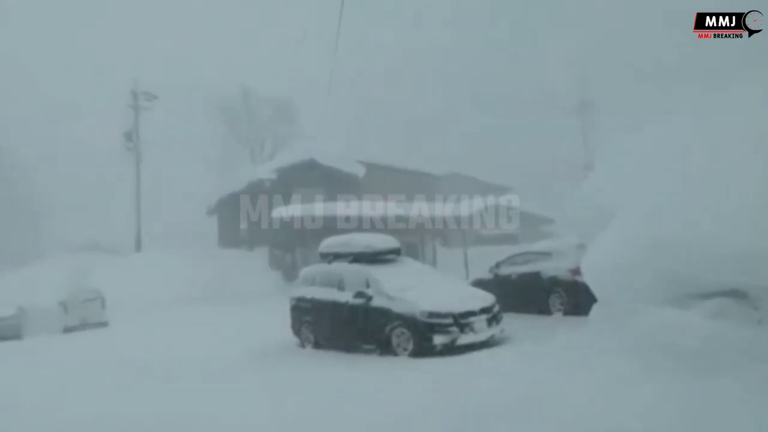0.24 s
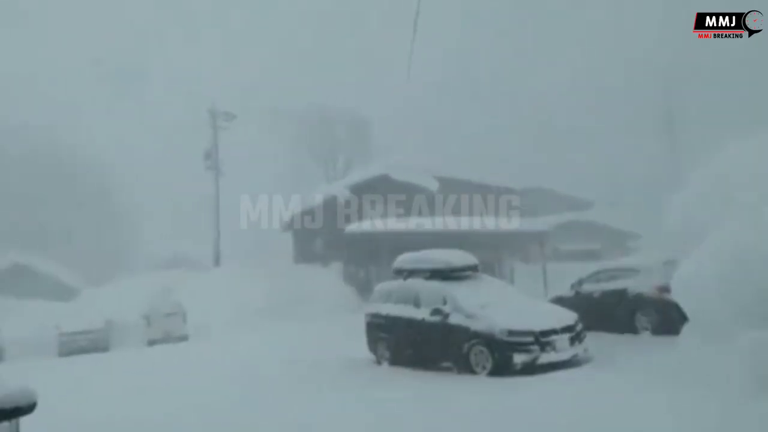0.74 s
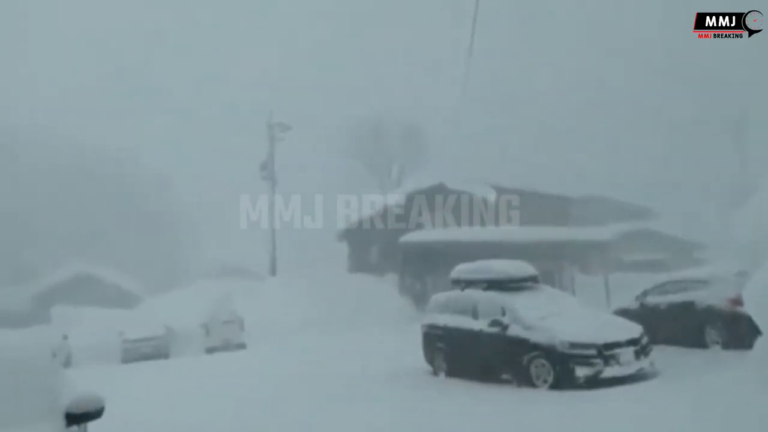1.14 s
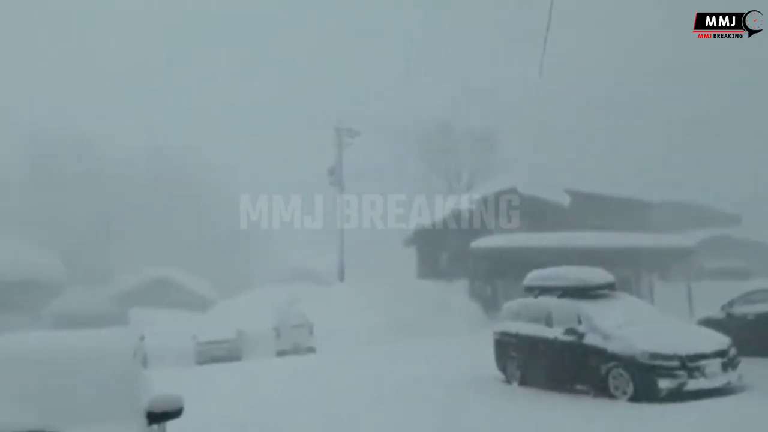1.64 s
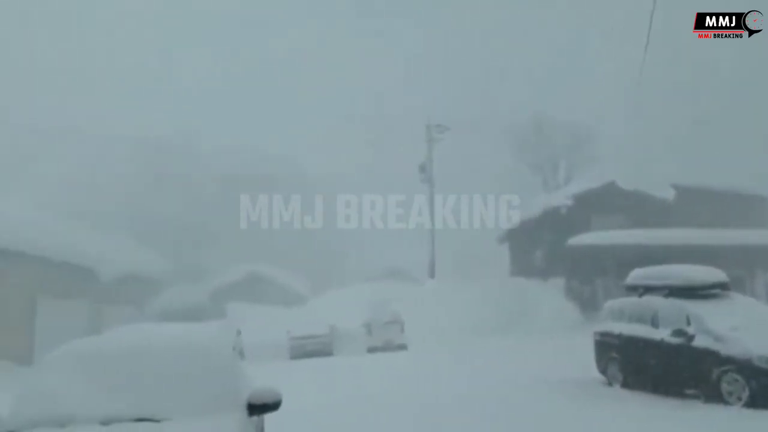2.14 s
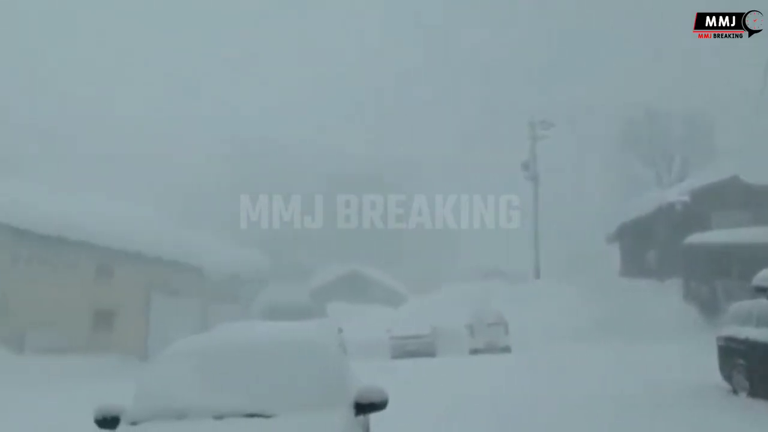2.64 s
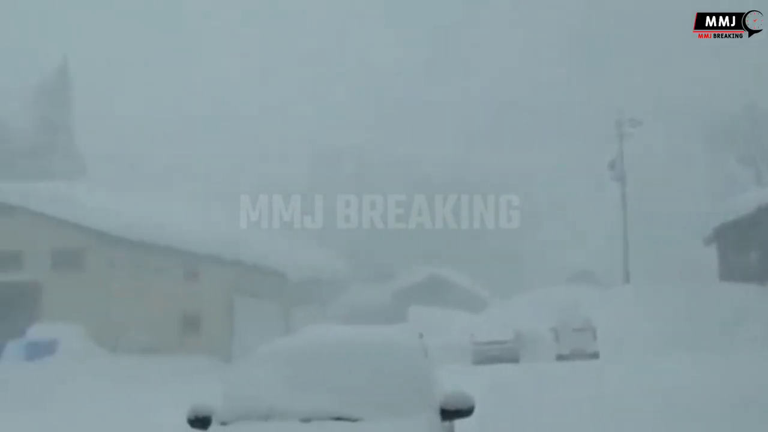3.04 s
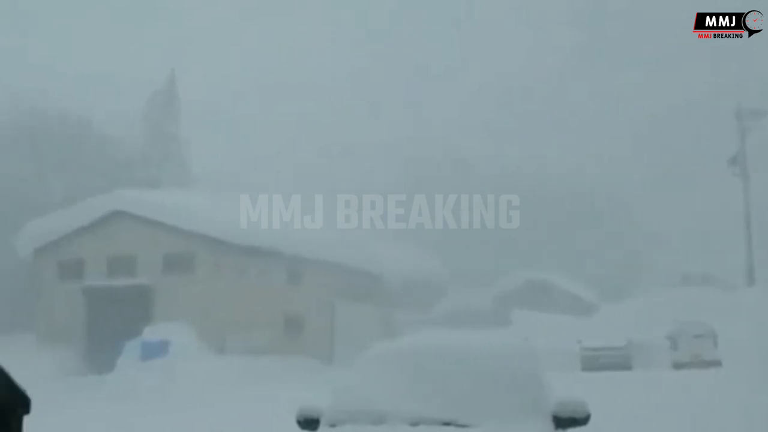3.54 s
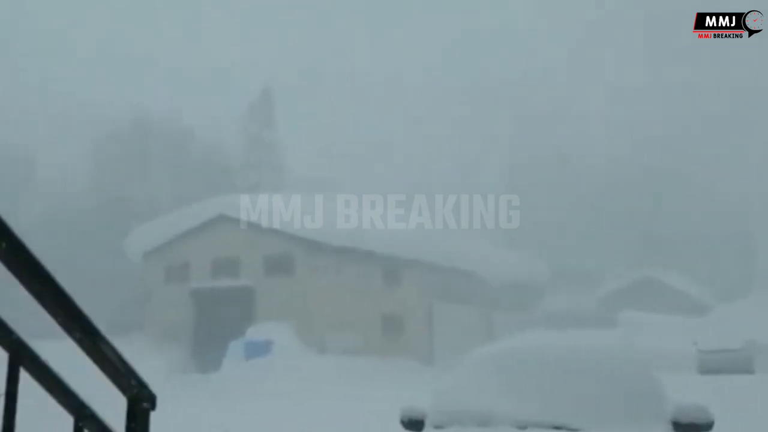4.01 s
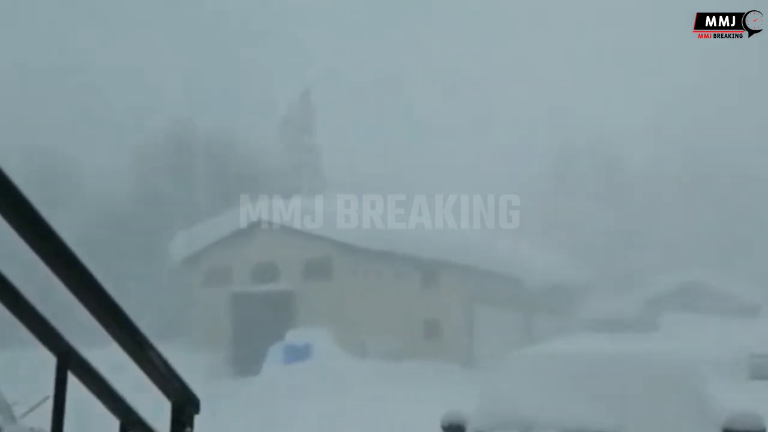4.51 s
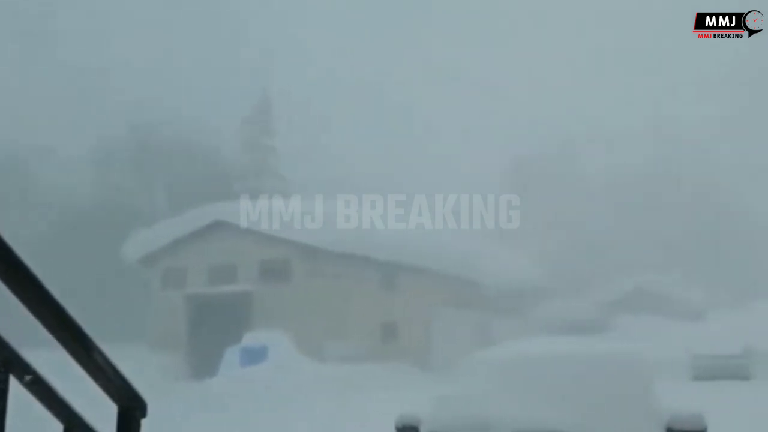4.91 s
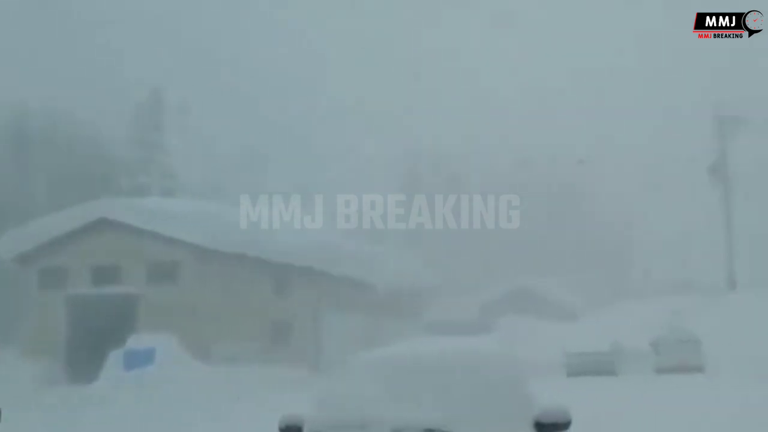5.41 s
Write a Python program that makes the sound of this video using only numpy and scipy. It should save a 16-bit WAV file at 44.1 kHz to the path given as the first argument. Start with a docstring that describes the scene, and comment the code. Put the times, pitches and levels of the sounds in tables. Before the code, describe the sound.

A blizzard blows across an open, snow-buried yard into a hand-held microphone. The sound starts faint and swells within 0.2 seconds into deep, rough, lumpy rumble, with quick buffets around 0.5 seconds and a strong surge near 1. Gusts keep striking irregularly, with heavy thumps near 1.8, 2.2 and 2.5 seconds. Beneath them a hollow low drone catches and moans, clearest near 0.5, 1.1, 1.8 and 3.8, while a fainter breathy howl slides above it, fullest around 2.1. Air rushes round walls and vehicles. Fine snow hisses in ragged, sandy bands, puffing up near 1.7, 2.5 and 4.3. Wind surges at 3.2, drops briefly at 3.4, returns by 3.6, eases around 4.7 to 5.0 and surges again near 5.4. A few tiny ice ticks are almost buried. The storm is still blowing when it cuts off at about 5.7 seconds.

```python
"""Blizzard wind blows across a snowed-in yard and onto a hand-held microphone.
Gusts buffet the port with a rough rumble of coloured noise, evened out and then swelled by the wind.
A hollow resonance drones, moans and howls as slow noise carried on moving pitches; air rushes round the houses.
Driven snow hisses in shifting bands with a sandy grain, and now and then an ice grain ticks on the case.
The microphone's faint self-noise lies beneath."""
import sys
import numpy as np
from scipy import signal
from scipy.fft import rfft, irfft, next_fast_len
from scipy.io import wavfile
from scipy.ndimage import uniform_filter1d

SR = 44100
rng = np.random.default_rng(int(sys.argv[2]) if len(sys.argv) > 2 else 0)


def inscribe(sig):
    """Save sig as 16-bit PCM at rate SR to the path in sys.argv[1].

    A 1-D sig is mono; a 2-D sig holds one channel per row.
    Samples are clipped to [-1, 1] before scaling.
    """
    pcm = np.round(np.clip(np.atleast_2d(sig).T, -1, 1) * 32767)
    wavfile.write(sys.argv[1], SR, pcm.astype(np.int16))


N = 249606  # samples

# Strength of the wind, before each layer's own share of it.
# Each row: time in seconds, dB over usual at the microphone, dB over usual across the yard.
WIND = [(0.0, -20.5, -16.5), (0.05, -18.5, -7.5), (0.16, -3.5, -2), (0.38, -4, -1), (0.65, -1, -0.5),
        (0.94, 6, 1), (1.1, 2, 2), (1.47, 2.5, 2.2), (1.6, -3, 0), (2.06, -1, 1.1), (2.3, -4, -1.6),
        (2.96, -3, 0.5), (3.21, 4.5, 2), (3.38, -7, -1), (3.57, 2.2, 2), (3.78, 1, 0), (4.0, 1.5, 1.5),
        (4.3, 2, 1.5), (4.78, -0.5, -2), (5.05, -1, -1), (5.36, 5, 1.5), (5.53, -4, -1.2),
        (5.66, -2.5, -1.5)]
# Gusts that hit the microphone, before each layer's own share of them.
# Each row: centre in seconds, length in seconds, lift of the rumble in dB, lift of the hiss in dB.
GUSTS = [(0.25, 0.1, 3.5, -2), (0.459, 0.14, 8, 1.5), (0.594, 0.075, 6, 1.5), (0.713, 0.14, 4, 2),
         (0.86, 0.18, -1.5, 2.5), (0.977, 0.11, 4.5, 1), (1.08, 0.14, 0.5, 3.5), (1.19, 0.14, 3, 0),
         (1.394, 0.21, 5, 0.5), (1.673, 0.1, 4.5, 1), (1.712, 0.062, 4, 7), (1.77, 0.17, 9, 1.7),
         (1.933, 0.052, 7.5, -1), (2.035, 0.087, -2.5, 1.5), (2.2, 0.1, 9, 1), (2.505, 0.13, 8, 5),
         (2.653, 0.076, 1, -2), (3.088, 0.12, 6.5, 1), (3.215, 0.07, -1.5, 3), (3.624, 0.2, 5, 1.5),
         (3.696, 0.052, 7, 1.5), (3.86, 0.082, 7.5, 1), (3.953, 0.049, 5.5, 1.5), (4.117, 0.15, 4.5, 1),
         (4.285, 0.18, 3.5, 3.7), (4.342, 0.066, 2, 1), (4.514, 0.11, 4.5, -1), (4.688, 0.08, 1.5, -1),
         (4.986, 0.11, 2, -1), (5.213, 0.087, 3.5, -2), (5.432, 0.091, 6.5, 4)]
# How thickly the snow blows past. Each row: time in seconds, dB over usual.
FLURRIES = [(0, -19), (.05, -9), (.16, -1), (.4, -2), (.72, -2), (.95, 2), (1.42, 2), (1.62, -1.5),
            (2.05, 1), (2.4, -3), (2.62, 0), (2.85, -0.7), (3.12, 0), (3.38, -3), (3.58, 1.6), (3.9, -1.1),
            (4.32, 2.5), (4.72, -4), (5.0, 0), (5.4, 1.5), (5.55, -2), (5.66, -0.5)]

# Centre of the hollow drone. Each row: time in seconds, pitch in Hz.
DRONE_PITCH = [(0, 257), (1.15, 261.6), (1.7, 258.9), (2.1, 257), (3.05, 256.4), (3.4, 268.6), (3.85, 267),
               (4.15, 256.2), (5.66, 250.2)]
# The drone sags briefly. Each row: centre in seconds, length in seconds, change in dB.
DRONE_SAGS = [(0.195, 0.29, -5.5), (0.66, 0.15, -13), (4.697, 0.061, -6), (5.123, 0.14, -15)]
# The drone catches and moans. Each row: centre in seconds, length in seconds, pitch in Hz, level in dB.
MOANS = [(0.114, 0.36, 254.7, -46.5), (.39, .22, 269.7, -42.5), (0.484, 0.18, 254.2, -38),
         (0.583, 0.094, 268.8, -39.5), (0.743, .14, 274.7, -43), (.89, .16, 250.6, -45),
         (1.092, .25, 262.8, -38.5), (1.252, 0.11, 260.8, -45), (1.379, 0.19, 263.2, -43.5),
         (1.802, .22, 245.9, -37), (2.016, 0.21, 265.3, -44), (2.311, 0.15, 251.5, -44),
         (2.42, 0.16, 257.4, -42), (2.659, .17, 251.4, -40), (2.793, .13, 258, -44),
         (2.891, 0.16, 260, -44.5), (3.059, 0.18, 278.4, -46), (3.202, .2, 250, -43.5),
         (3.564, .2, 274.3, -41), (3.849, .25, 270.4, -38), (4.258, .16, 253.4, -41.5),
         (4.407, 0.22, 255.5, -43.5), (4.63, .14, 243.6, -42), (4.803, 0.15, 248.7, -41),
         (4.899, .16, 250.9, -41), (5.221, 0.16, 246.2, -43.5), (5.35, .16, 259.7, -45),
         (5.52, 0.17, 241, -43.5), (5.66, .16, 253, -37.5)]
# The howl above the drone. Each row: time in seconds, pitch in Hz, relative level in dB.
HOWL = [(0, 445, -1), (1.15, 470, -1), (1.7, 470, -4.5), (2.1, 440, 7.5), (2.5, 450, 3), (3.05, 500, 1),
        (3.4, 510, 1), (3.85, 475, -3.5), (4.2, 465, 0), (4.6, 470, 3), (5.66, 450, -4.5)]
# Ice grains on the case.
# Each row: centre in seconds, level in dB, ring in Hz, width of the ring in Hz, length in seconds.
ICE_GRAINS = [(.702, -79, 8100, 1400, 0.039), (0.829, -73.5, 8100, 1700, .017),
              (1.255, -80, 8260, 900, .03), (1.447, -86, 8700, 1500, 0.039),
              (1.65, -88.5, 10500, 4500, .07), (3.518, -82, 10200, 350, 0.028),
              (4.376, -84, 9700, 3200, .035), (4.789, -76, 10100, 400, 0.043),
              (4.947, -77.5, 10300, 400, 0.039)]

# Spectra of the noise layers; only their shape counts. Each row: frequency in Hz, density in dB per Hz.
RUMBLE_SPECTRUM = [(12, -18.5), (25, -11.5), (42, -6.5), (60, 1), (78, -4), (110, -9.5), (150, -23.5),
                   (195, -32), (320, -45.5), (600, -59.5)]
CHURN_SPECTRUM = [(70, -15), (105, 1.5), (150, 3), (195, -4.5), (260, -5), (340, -12), (450, -19),
                  (700, -33.5)]
RUSH_SPECTRUM = [(150, -5), (200, 2.5), (330, 2.5), (385, -1.5), (470, 0.5), (550, -3.5), (630, -6),
                 (790, -6), (1000, -9.5), (1400, -13), (2200, -25), (3500, -29)]
SNOW_SPECTRUM = [(700, -22.5), (1300, -4.5), (1800, 2.5), (2500, -1.5), (4000, -5), (4900, -6.5),
                 (5600, -12.5), (6300, -30), (6900, -34.5), (7500, -46), (9000, -51)]
SIZZLE_SPECTRUM = [(4800, -17.5), (5600, 1.5), (6500, -2), (7300, -10.5), (8200, -23), (9200, -35)]
FLOOR_SPECTRUM = [(6500, -13), (8500, 0.5), (12000, 0), (15500, -6)]

# Level of each layer in the usual wind (dB), and how far it follows its driver (dB per dB)
RUMBLE_DB = -33.5
CHURN_DB, CHURN_FOLLOWS = -43.5, 0.74
DRONE_DB, DRONE_FOLLOWS = -44, 0.48
HOWL_DB = -57
RUSH_DB, RUSH_GUST_SHARE = -49, 0.45  # share of a gust's lift of the hiss
SNOW_DB = -61
SIZZLE_DB, SIZZLE_FOLLOWS = -77.5, 0.88
FLOOR_DB = -98.5
DRONE_WIDTH_HZ, HOWL_WIDTH_HZ = 53.7, 86
CUTOFF_HZ = 15500


def from_db(db):
    """Decibels to gain."""
    return 10 ** (np.asarray(db) / 20)


def rms_one(x):
    """Scale to unit rms."""
    return x / np.sqrt(np.mean(x ** 2) + 1e-20)


def in_time(rows):
    """Each column of a curve, at every sample."""
    s, *columns = np.transpose(rows)
    return [np.interp(np.arange(N) / SR, s, column) for column in columns]


def bell(s, length_s):
    """A smooth rise to 1 at the given time and an equal fall."""
    return np.cos(np.pi * np.clip((np.arange(N) / SR - s) / length_s, -0.5, 0.5)) ** 2


def coloured(x, spectrum):
    """Give a white signal a spectrum, silent outside its ends; rms 1."""
    hz, db = np.transpose(spectrum)
    bins_hz = np.maximum(np.arange(N // 2 + 1) * SR / N, 1)
    gain = from_db(np.interp(np.log(bins_hz), np.log(hz), db, left=-np.inf, right=-np.inf))
    return rms_one(irfft(rfft(x) * gain, N))


def drift(rate_hz):
    """Smooth chance that wanders mostly below the given rate; spread 1."""
    step = 32  # samples between the slow points
    size = next_fast_len(N // step + 2)
    bins_hz = np.arange(size // 2 + 1) * SR / step / size
    lowpass = 1 / np.sqrt(1 + (bins_hz / rate_hz) ** 4)
    slow = irfft(rfft(rng.standard_normal(size)) * lowpass, size)
    return np.interp(np.arange(N) / step, np.arange(size), rms_one(slow))


def evened(x, span_s):
    """Hold the power of a noise near 1 over a span, so that its level curves set the swell."""
    size = max(int(span_s * SR), 2)
    power = uniform_filter1d(uniform_filter1d(np.abs(x) ** 2, size), size)
    return x / np.sqrt(power + 1e-9)


def quiver(width_hz):
    """Random swell and phase of a resonance of the given width; rms 1."""
    return (drift(width_hz / 2) + 1j * drift(width_hz / 2)) / np.sqrt(2)


def sounded(swell, hz):
    """Carry a resonance's swell and phase on its moving pitch; rms 1."""
    carrier = np.exp(2j * np.pi * np.cumsum(hz) / SR)
    return rms_one(np.real(swell * carrier))


def swirled(x, patchy_db, swirl_hz, edges):
    """Passing swirls lift and drop each band of the hiss on its own, never by more than two spreads."""
    size = next_fast_len(N)
    band_of_bin = np.searchsorted(edges, np.arange(size // 2 + 1) * SR / size)
    whole = rfft(x, size)
    out = np.zeros(N)
    for k in range(len(edges) + 1):
        band = irfft(whole * (band_of_bin == k), size)[:N]
        out += band * from_db(patchy_db * np.clip(drift(swirl_hz), -2, 2))
    return out


def gusts():
    """Each gust swells and dies in a bell; the lift of the rumble and of the hiss in dB."""
    return sum(np.outer([thump_db, puff_db], bell(s, length)) for s, length, thump_db, puff_db in GUSTS)


def eddies():
    """Lumpy pressure of the vortices that roll over the port; power near 1."""
    return evened(coloured(rng.standard_normal(N), RUMBLE_SPECTRUM), span_s=0.076)


def churn():
    """Smaller, faster eddies fill out the rough upper part of the rumble; power near 1."""
    return evened(coloured(rng.standard_normal(N), CHURN_SPECTRUM), span_s=0.079)


def drone(core_width_hz=4, waver_db=1.5, waver_hz=8):
    """Turbulence keeps a hollow resonance sounding: a windy band, from which short moans rise and waver."""
    hz, = in_time(DRONE_PITCH)
    _, yard_db = in_time(WIND)
    sag_db = sum(db * bell(s, length) for s, length, db in DRONE_SAGS)
    level_db = DRONE_DB + DRONE_FOLLOWS * yard_db + sag_db + waver_db * drift(waver_hz)
    band = evened(sounded(quiver(DRONE_WIDTH_HZ), hz), span_s=0.13) * from_db(level_db)

    core = evened(quiver(core_width_hz), span_s=0.052)
    t = np.arange(N) / SR
    moans = np.zeros(N)
    for s, length, moan_hz, db in MOANS:
        span = np.abs(t - s) < length / 2
        tone = sounded(core[span], np.full(span.sum(), moan_hz))
        moans[span] += from_db(db) * bell(s, length)[span] * tone
    return band + moans


def howl(puff_db=2, puff_hz=9):
    """A fainter, breathy resonance comes in puffs and slides up and down above the drone; rms 1."""
    hz, level_db = in_time(HOWL)
    puffs = from_db(level_db + puff_db * drift(puff_hz))
    return sounded(quiver(HOWL_WIDTH_HZ) * puffs, hz)


def rush(flutter, flutter_db):
    """Air tearing round walls and cars, shaken by the turbulence; rms 1."""
    air = coloured(rng.standard_normal(N), RUSH_SPECTRUM)
    return rms_one(air * from_db(flutter_db * flutter))


def snow(flutter, flutter_db, grains_per_s, size_db, grain_share):
    """Countless fine crystals merge into a hiss; nearer ones add a faint sandy grain; rms 1."""
    sizes = from_db(size_db * np.minimum(rng.exponential(1, N), 3)) * rng.choice([-1, 1], N)
    near = rms_one(sizes * (rng.random(N) < grains_per_s / SR))
    crystals = coloured(rng.standard_normal(N) + grain_share * near, SNOW_SPECTRUM)
    hiss = swirled(crystals, patchy_db=3.0, swirl_hz=21.6, edges=np.geomspace(1400, 7000, 32))
    return rms_one(hiss * from_db(flutter_db * flutter))


def sizzle(patchy_db=7, swirl_hz=22):
    """The top edge of the hiss comes and goes in ragged patches; rms 1."""
    edge = coloured(rng.standard_normal(N), SIZZLE_SPECTRUM)
    return rms_one(swirled(edge, patchy_db, swirl_hz, np.geomspace(5200, 8800, 17)))


def self_noise():
    """Steady, faint high hiss of the microphone itself; rms 1."""
    return coloured(rng.standard_normal(N), FLOOR_SPECTRUM)


def ticks():
    """Each ice grain skitters for an instant: some with a broad, gritty spatter, some with a tiny, high ring."""
    out, t = np.zeros(N), np.arange(N) / SR
    for s, db, hz, width_hz, length in ICE_GRAINS:
        span = np.abs(t - s) < length / 2
        case = signal.butter(2, [hz - width_hz / 2, hz + width_hz / 2], "band", fs=SR, output="sos")
        # the end of a longer noise, where the filter has settled
        grit = signal.sosfilt(case, rng.standard_normal(SR // 10))[-span.sum():]
        out[span] += from_db(db) * bell(s, length)[span] * rms_one(grit)
    return out


def scene(lumpy_db=1.0, lumpy_hz=20):
    """Wind, gusts and flurries drive the layers; the eddies at the port also shake the rush and the hiss."""
    near_db, yard_db = in_time(WIND)
    flurry_db, = in_time(FLURRIES)
    thump_db, puff_db = gusts()
    pressure = eddies()
    flutter = rms_one(drift(23) + 0.5 * pressure)

    buffet_db = near_db + thump_db
    rumble = from_db(RUMBLE_DB + buffet_db + lumpy_db * drift(lumpy_hz)) * pressure
    rumble = rumble + from_db(CHURN_DB + CHURN_FOLLOWS * buffet_db) * churn()
    moan = drone() + from_db(HOWL_DB + yard_db) * howl()
    air = from_db(RUSH_DB + yard_db + RUSH_GUST_SHARE * puff_db) * rush(flutter, flutter_db=1.31)

    snow_db = flurry_db + puff_db
    crystals = snow(flutter, flutter_db=1.0, grains_per_s=4000, size_db=4.5, grain_share=0.35)
    hiss = from_db(SNOW_DB + snow_db) * crystals
    edge = from_db(SIZZLE_DB + SIZZLE_FOLLOWS * snow_db) * sizzle()
    floor = from_db(FLOOR_DB) * self_noise()
    return (rumble + moan + air + hiss + edge + floor + ticks())[None, :]


def record(dry):
    """The top is cut steeply, and a 4 ms fade ends the sound without a click."""
    fade = np.minimum(np.arange(N)[::-1] / (0.004 * SR), 1)
    top_cut = signal.cheby2(12, 60, CUTOFF_HZ, fs=SR, output="sos")
    return signal.sosfilt(top_cut, dry * fade)


dry = scene()
out = record(dry)
inscribe(out)
```